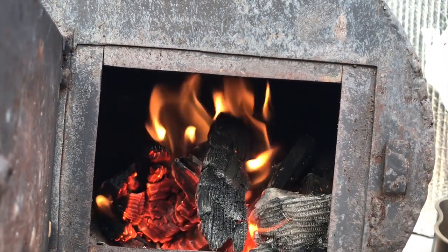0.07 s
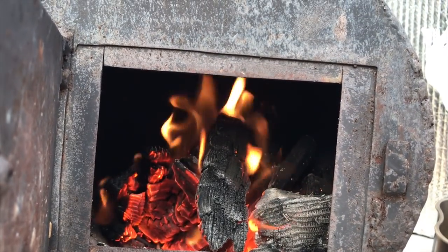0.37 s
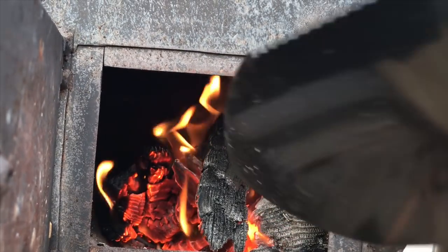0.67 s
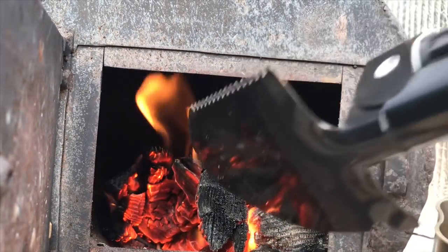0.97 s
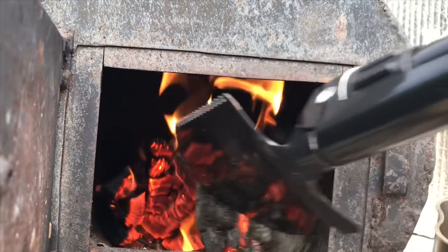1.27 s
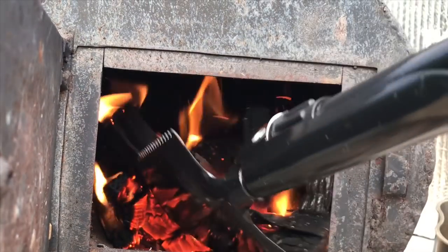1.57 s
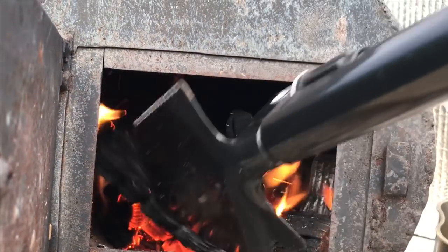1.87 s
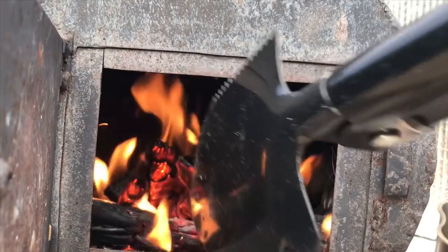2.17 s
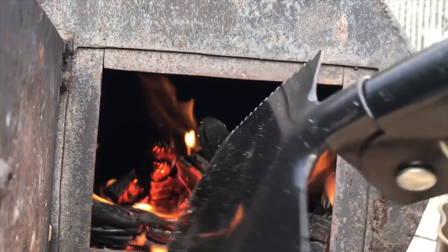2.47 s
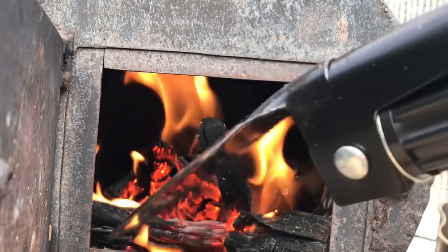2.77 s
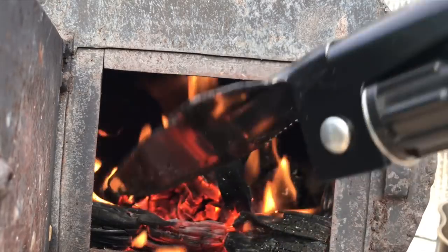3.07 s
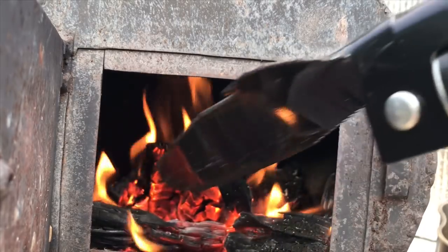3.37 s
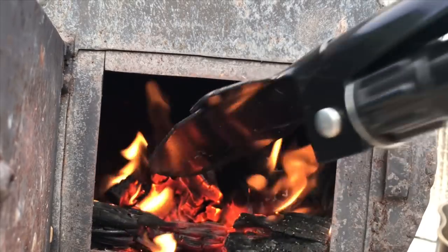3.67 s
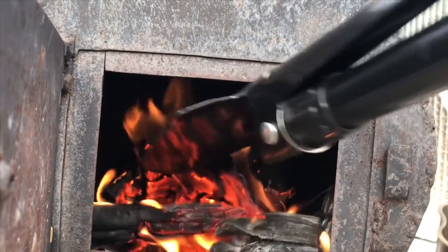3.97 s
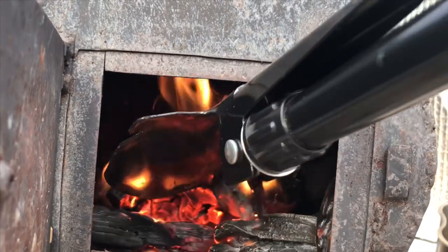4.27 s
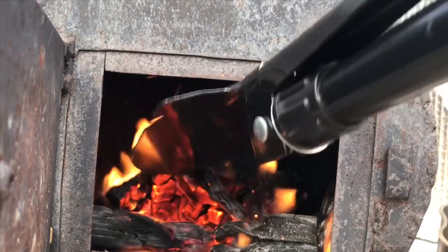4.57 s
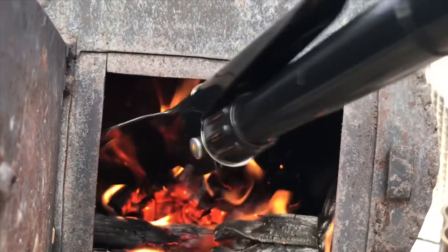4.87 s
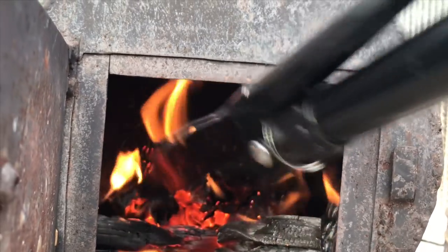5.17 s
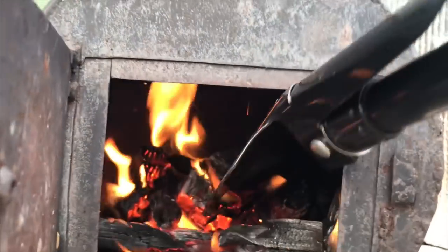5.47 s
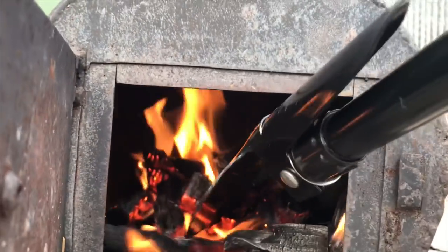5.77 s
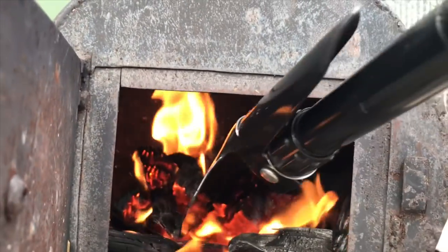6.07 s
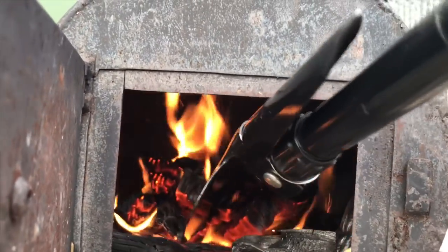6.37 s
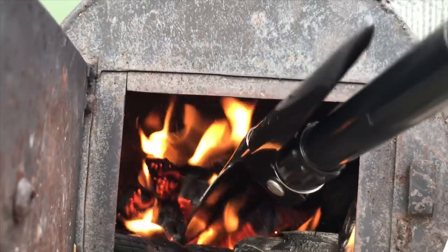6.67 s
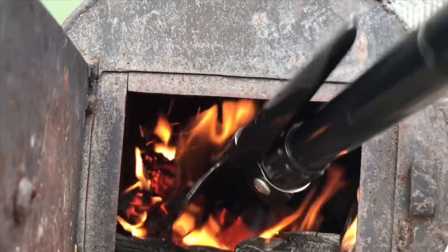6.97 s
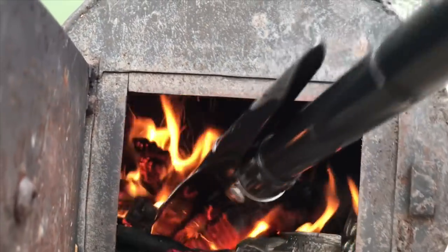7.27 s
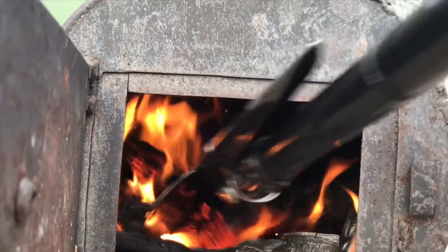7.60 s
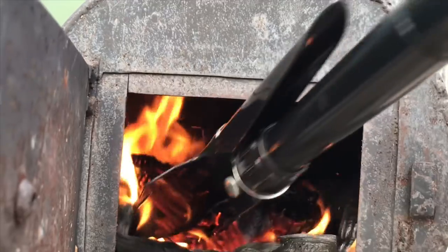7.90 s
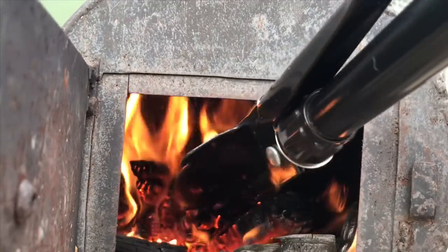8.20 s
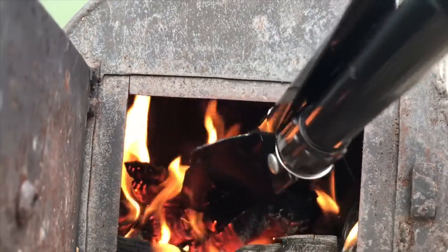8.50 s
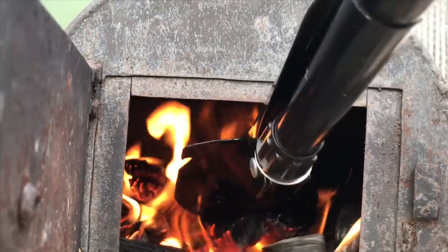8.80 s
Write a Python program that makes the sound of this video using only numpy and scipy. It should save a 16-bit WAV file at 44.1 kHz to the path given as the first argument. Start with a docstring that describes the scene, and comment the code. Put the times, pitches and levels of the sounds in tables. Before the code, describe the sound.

An open wood stove is heard from close by: flames flutter with a soft low rumble, under a fine sizzle and sharp wood snaps that continue throughout. At about 1.2 seconds a steel shovel crunches into brittle charcoal, scrapes over the grate and knocks on the iron firebox, hardest at 1.6, then squeaks around 2. From 2.4 the fire crackles alone. A clang at 3.6 and a louder double knock near 3.85 open a longer bout of stirring, with a sharp snap at 4.1. Uneven gritty strokes follow while logs judder over the iron with a low hum. Ringing thuds come at 4.6 and cluster between 5.1 and 5.6. Crunching continues with loud snaps and brighter metallic knocks near 6.6, 7.1, 7.4 and 8.2. Short steel squeaks fall between 7.3 and 8, the last the strongest. A final crunching push comes around 8.7.

```python
"""A steel shovel stirs burning logs and coals in an open wood stove, heard from close by.
Flames flutter and wood snaps from the start and throughout. From 1.15 s the blade crunches through
brittle charcoal, drags over the grate, knocks on the iron firebox and shoves logs along it; near 2 s
it sticks and squeaks. From 2.4 s the fire burns alone. At 3.6 s a knock opens a longer bout of
stirring, with more squeaks around 8 s."""
import sys
import numpy as np
from scipy import signal
from scipy.fft import rfft, irfft
from scipy.io import wavfile

SR = 44100
rng = np.random.default_rng(int(sys.argv[2]) if len(sys.argv) > 2 else 0)


def wav_record(signal):
    """Record a signal, one row per channel, as 16-bit PCM in the file named by sys.argv[1]."""
    frames = np.transpose(np.atleast_2d(signal))
    bounded = np.clip(frames, -1, 1)
    # unit amplitude maps onto the largest positive 16-bit level
    quanta = np.round(bounded * 32767).astype(np.int16)
    wavfile.write(sys.argv[1], SR, quanta)


N = 389844
CUTOFF_HZ = 15900
MODE_SPLIT_HZ = 750   # firebox modes below, blade modes above

# firebox, shaft and blade modes: (frequency [Hz], level [dB], t60 [s])
IRON_MODES = [(137.1, -1.5, 0.65), (223, -10, 0.43), (250, -4, 0.24), (312.5, -6.5, 0.45),
              (332, -10.5, 0.32), (367, -5.5, 0.074), (418.7, -0.5, 0.27), (437.4, -5, 0.32),
              (472, -16.5, 0.47), (634, -2.5, 0.094), (666, -9.5, 0.37), (853, -16, 0.5),
              (940, -13.5, 0.38), (985, -11.5, 0.39), (1236, -9, 0.37), (1272, 1.5, 0.19), (1475, -8, 0.12),
              (1617, -6.5, 0.25), (1780, -8, 0.095), (2085, -21.5, 0.4), (2403, -10.5, 0.19),
              (2730, -15, 0.12), (3116, -19, 0.2), (3560, -16, 0.24), (3750, -22, .08)]
# bright modes of the thin blade: (frequency [Hz], level [dB], t60 [s])
EDGE_MODES = [(2700, 2.5, 0.021), (3116, -3, 0.026), (3510, -1, 0.03), (3844, 3, 0.012),
              (4364, -2.5, 0.053), (5900, -3, 0.023), (6600, -12, 0.014), (7320, 11, 0.0059),
              (8580, 6, 0.016), (9620, 6, 0.019), (11500, 2, 0.019), (12816, -0.5, .03), (13964, 0, 0.038),
              (15400, 8, 0.016)]
# spectrum of steel dragging on iron: (frequency [Hz], level [dB])
DRAG_SPECTRUM = [(450, -11.5), (750, -4), (960, 9), (1100, 1), (1300, 6.5), (1800, 4.5), (2400, -2.5),
                 (3400, 2.5), (6000, -8)]


def from_db(db):
    return 10 ** (np.asarray(db) / 20)


def rms_one(x):
    return x / np.sqrt(np.mean(x ** 2) + 1e-20)


def in_time(rows):
    """Each column of a curve at every sample."""
    times_s, *columns = np.transpose(rows)
    return [np.interp(np.arange(N) / SR, times_s, column) for column in columns]


def add(out, start_s, sound):
    i = int(np.clip(start_s * SR, 0, N - 1))
    out[i:i + len(sound)] += sound[:N - i]


def drift(rate_hz):
    """Smooth random wander; rms 1."""
    hop, settle = 40, 2000
    r = np.exp(-2 * np.pi * rate_hz * hop / SR)
    noise = rng.standard_normal(N // hop + settle + 2)
    slow = signal.lfilter([1], [1, -2 * r, r * r], noise)[settle:]
    return np.interp(np.arange(N) / hop, np.arange(len(slow)), rms_one(slow))


def colour(x, spectrum):
    """Minimum-phase filter from (frequency [Hz], level [dB]), -18 dB/octave past its ends; rms 1."""
    size = 8192
    hz, db = np.transpose(spectrum)
    octave = np.log2(np.maximum(np.arange(size // 2 + 1), 1) * SR / size)
    outside = np.abs(octave - np.clip(octave, np.log2(hz[0]), np.log2(hz[-1])))
    gain = from_db(np.interp(octave, np.log2(hz), db) - 18 * outside)
    cepstrum = irfft(np.log(gain))
    response = irfft(np.exp(rfft(2 * cepstrum[:size // 2], size)))
    return rms_one(signal.fftconvolve(x, response)[:len(x)])


def grains(per_s, spread_db):
    """Random clicks of uneven size; rms 1."""
    sizes = from_db(spread_db * np.minimum(rng.exponential(1, N), 4))
    return rms_one(sizes * rng.choice([-1, 1], N) * (rng.random(N) < per_s / SR))


def ring(force, hz, t60_s):
    """One mode: a unit click starts a decaying sine of height 1."""
    r, w = from_db(-60 / (t60_s * SR)), 2 * np.pi * hz / SR
    return signal.lfilter([0, np.sin(w)], [1, -2 * r * np.cos(w), r * r], force + 1e-18)


def rub(force, modes, wander_db):
    """A sliding contact drives each mode by a share that changes as it travels; rms 1."""
    return rms_one(sum(ring(force * from_db(db + wander_db * drift(4.3)), hz, t60_s)
                       for hz, db, t60_s in modes))


def pushes(rows, attack_s, release_db_per_s):
    """Envelope from (time [s], length [s], level [dB], swell [dB]); overlaps add in power."""
    power = np.zeros(N)
    for start_s, length_s, db, swell_db in rows:
        t = np.arange(int((length_s + 50 / release_db_per_s) * SR)) / SR
        held_db = db + swell_db * (np.minimum(t / length_s, 1) - .5)
        release_db = release_db_per_s * np.maximum(t - length_s, 0)
        push = np.minimum(t / attack_s, 1) * from_db(held_db - release_db)
        add(power, start_s, push ** 2)
    return np.sqrt(power)


def firebox(x, wet_db, t60_s):
    """Adds dense, short reflections between the stove's walls."""
    t = np.arange(SR // 5) / SR
    echoes = rng.standard_normal(len(t)) * from_db(-60 * t / t60_s) * (t > .0015)
    return x + from_db(wet_db) * signal.fftconvolve(x, echoes / np.linalg.norm(echoes))[:N]


def fire():
    """Flames rumble and flutter in low puffs; sap sizzles and ticks."""
    # spectra: (frequency [Hz], level [dB])
    flame_spectrum = [(12, -25), (20, -69), (54, 1.5), (160, -11.5), (235, -3), (276, -15), (312, -14),
                      (414, -26.5), (517, -20), (823, -24), (1210, -24), (2500, -38), (3250, -61),
                      (5500, -120)]
    sizzle_spectrum = [(1500, 1), (3000, -3.5), (4500, -3), (6500, 0.5), (10000, -3), (13000, 1.5),
                       (15500, 3)]
    puff_spectrum = [(70, -2.5), (120, -1), (230, -7), (310, -13), (420, -17.5)]
    tick_spectrum = [(3000, -5.5), (7000, -3.5), (13000, 2.0), (15500, -2)]
    roar = from_db(-53) * colour(rng.standard_normal(N) * from_db(2 * drift(20)), flame_spectrum)
    puffing = rng.standard_normal(N) * from_db(6 * np.minimum(drift(22), 2))
    puffs = from_db(-55.5) * colour(puffing, puff_spectrum)
    sizzle = from_db(-59.5) * colour(grains(per_s=7000, spread_db=3.5), sizzle_spectrum)
    ticks = from_db(-60) * colour(grains(per_s=110, spread_db=7.5), tick_spectrum)
    return roar + puffs + sizzle + firebox(ticks, wet_db=-2, t60_s=0.016)


def snaps():
    """Wood and coals fracture, then splinter for milliseconds; smaller pieces have less body."""
    # fractures: (time [s], relative level [dB], pitch [Hz])
    fractures = [(0.0188, -18, 11200), (0.181, -24.5, 13200), (0.2426, -19.5, 7900), (0.406, -21.5, 14100),
                 (0.6728, -23.5, 4070), (0.7479, -14, 6000), (1.067, -22.5, 4160), (1.1497, -8.5, 14000),
                 (2.0438, -18, 3890), (2.1236, -9, 3380), (2.1876, -9, 12800), (2.3055, -14, 12300),
                 (2.423, -21, 15000), (2.4646, -15.5, 16000), (2.485, -21.5, 3214), (2.514, -13, 14200),
                 (2.573, -14, 14200), (2.6564, -25, 12900), (2.774, -23, 7500), (3.1153, -14, 5470),
                 (3.1526, -17, 9200), (3.18, -23, 9460), (3.281, -20, 11200), (3.3354, -12.5, 13000),
                 (3.4003, -11.5, 11600), (3.5162, -13, 11900), (3.5538, -22, 4100), (3.6425, -16, 14800),
                 (3.71, -17, 5640), (3.932, -1, 13900), (3.9743, -4.5, 4160), (4.0065, -20, 9570),
                 (4.1004, 5, 10000), (4.2677, -11, 11400), (4.2975, -13, 14400), (4.5118, -19, 14000),
                 (5.3645, -19, 12400), (5.454, -19, 6300), (5.7553, -14, 8500), (5.8605, -8, 7900),
                 (5.9453, -11, 8500), (5.9956, -1, 8470), (6.5137, -5.5, 4020), (6.571, -1.5, 3510),
                 (7.0317, -7, 4860), (7.079, -8, 3070), (7.105, -7, 6390), (7.5385, -7.5, 12270),
                 (7.7132, -0.5, 14700), (7.8912, 0, 6000), (8.076, -13, 11500), (8.1435, -20, 5470),
                 (8.1844, -17, 7080), (8.277, -12.5, 9000), (8.554, -11.5, 13200), (8.762, 0, 12700)]
    out, t = np.zeros(N), np.arange(int(.04 * SR)) / SR
    splintering = from_db(-60 * t / 0.0015) + from_db(-2.5 - 60 * t / 0.018)
    bandwidth_hz = 2200
    r = np.exp(-np.pi * bandwidth_hz / SR)
    gain = (1 - r * r) / 2
    for start_s, db, hz in fractures:
        burst = rng.standard_normal(len(t)) * splintering
        burst[0] = 5.8   # the first break is the strongest
        w = 2 * np.pi * min(hz, CUTOFF_HZ) / SR
        piece = signal.lfilter([gain, 0, -gain], [1, -2 * r * np.cos(w), r * r], burst)
        body_db = min(0.35 * (db - 2), 2)   # loud snaps come from thick wood
        body = [(900, body_db - 3.5), (2000, body_db - .5), (3500, body_db + 2)]
        snap = colour(piece + 0.74 * burst, body + [(7000, 0.32), (15000, 0.64)])
        add(out, start_s + 0.00054, from_db(db - 29.5) * snap)   # a snap peaks far above its rms
    return out


def stirring():
    """Blade strokes over the steady trickle of each dig drive the crunch and the drag."""
    # blade dug in, embers trickling past: (time [s], length [s], crunch [dB], drag [dB])
    digs = [(1.152, 1.14, -44, -56), (3.696, 0.53, -50.5, -55), (4.315, .19, -62, -63),
            (4.651, 0.47, -46.5, -52), (5.714, 1.8, -48.5, -61), (6.947, 1.12, -46, -49.5),
            (8.451, 0.32, -43.5, -50.5)]
    # pushes through the coals: (time [s], length [s], crunch [dB], drag [dB], swell [dB])
    strokes = [(1.165, .09, -37.5, -50, -2), (1.255, .18, -29, -53, 5), (1.43, 0.14, -33.5, -57, 4),
               (1.545, 0.088, -30.5, -43.5, 7), (1.78, 0.032, -31.5, -42, -3),
               (1.835, 0.17, -34.5, -44, -13), (2.015, 0.15, -34.5, -43, -8), (3.735, 0.094, -43, -55, 9),
               (3.88, 0.25, -36, -44.5, 1), (4.12, 0.2, -44, -50.5, -3), (4.665, 0.12, -40.5, -48, 10.5),
               (4.79, 0.072, -49, -39, 3), (4.895, 0.096, -36.5, -41.5, 1), (5.065, 0.027, -46, -58, -2),
               (5.385, .13, -53.5, -48, 2), (5.625, .055, -51, -38.5, -13),
               (5.708, 0.066, -26.5, -38, -8.5), (5.852, 0.034, -38, -55, -2), (5.94, 0.14, -32, -43.5, 8),
               (6.228, 0.072, -38, -50, 9), (6.42, 0.073, -45, -49, 2), (6.498, 0.085, -29.5, -38.5, -3),
               (6.675, 0.12, -40.5, -50, 1), (6.768, 0.062, -32.5, -38.5, 0.5), (6.89, 0.078, -46, -54, 11),
               (7.025, 0.13, -31.5, -49, 15), (7.3, 0.066, -34.5, -44, -6), (7.358, 0.04, -23, -32.5, -0.5),
               (7.57, 0.15, -42, -45, -8), (7.66, 0.087, -32, -38, -1), (7.908, 0.15, -36.5, -48, -1),
               (8.19, .12, -43.5, -40.5, -13), (8.378, 0.045, -42.5, -59, -4),
               (8.485, 0.093, -40.5, -42.5, 9.5), (8.708, 0.083, -28.5, -35, 6)]
    moves = list(strokes) + [(*dig, 0) for dig in digs]
    start_s, length_s, crunch_db, drag_db, swell_db = np.transpose(moves)
    breaking, dragging = [
        pushes(zip(start_s, length_s, db, swell_db), attack_s=0.015, release_db_per_s=443)
        for db in (crunch_db, drag_db)]
    catching = from_db(2.41 * drift(72))   # the edge catches and slips
    return crunch(breaking * catching) + drag(dragging * catching)


def crunch(envelope):
    """Charcoal breaks in clumps of tiny fractures that ring its pieces and the blade's edge."""
    # breaking charcoal: (frequency [Hz], level [dB])
    dust_spectrum = [(1200, -26), (2300, -15.5), (3400, -5), (4500, 0), (5300, 1), (6400, 5.5), (7400, -3),
                     (8500, 5), (10200, -4), (12000, 3.5), (15500, 2.5)]
    # coarse char is dull, fine embers bright: (time [s], treble gain [dB])
    fineness = [(1.1, 2), (2.2, -25.5), (4.05, 5), (4.85, 8), (6.05, -3), (7.2, -1.5), (7.7, 0)]
    dust = envelope * from_db(-2.5) * colour(grains(per_s=7000, spread_db=0), dust_spectrum)
    pieces = envelope * from_db(-7.5) * clinks(per_s=1800, t60_cycles=110, wander_db=4, count=40)
    edge_force = envelope * grains(per_s=2000, spread_db=-1)
    edge = np.std(envelope) * from_db(-7) * rub(edge_force, EDGE_MODES, wander_db=6.5)
    mix = dust + pieces + edge
    treble = signal.lfilter(*signal.butter(1, 11000, "high", fs=SR), mix)
    treble_db, = in_time(fineness)
    return mix + (from_db(treble_db) - 1) * treble


def clinks(per_s, t60_cycles, wander_db, count):
    """Charcoal pieces ring in flurries, each at its own pitch; rms 1."""
    pitches_hz = np.geomspace(3000, 15000, count) * rng.uniform(.97, 1.03, count)
    fractures = grains(per_s, spread_db=4)
    piece = rng.integers(0, count, N)
    out = np.zeros(N)
    for k, hz in enumerate(pitches_hz):
        flurry = from_db(wander_db * drift(19))
        out += ring(fractures * (piece == k), hz, t60_cycles / hz) * hz * flurry
    return rms_one(out)


def drag(envelope):
    """The edge scrapes over the grate and sets the blade ringing."""
    scrape = envelope * from_db(-5) * colour(grains(per_s=3000, spread_db=1), DRAG_SPECTRUM)
    blade_modes = [mode for mode in IRON_MODES if mode[0] > MODE_SPLIT_HZ]
    return scrape + from_db(-6) * np.std(scrape) * rub(scrape, blade_modes, wander_db=3)


def knocks():
    """A blow chatters for its contact time, then decays: dull thud, ringing iron, burst of grit."""
    # blade and logs hit the iron:
    # (time [s], thud [dB], thud pitch [Hz], clang [dB], clang pitch [Hz], crack [dB], contact [s])
    blows = [(1.183, -34.5, 432, -29.5, 1090, -31, 0.0034), (1.222, -37, 410, -35.5, 1330, -54, 0.0052),
             (1.615, -29, 292, -23.5, 900, -17, 0.02), (1.788, -34, 620, -31, 1550, -28, 0.0041),
             (2.183, -30, 452, -30.5, 1260, -48, 0.0014), (3.569, -26, 334, -18.5, 1400, -19.5, 0.0058),
             (3.8398, -20, 364, -18, 1620, -25, 0.011), (3.859, -24, 420, -19, 1240, -24, 0.0047),
             (4.599, -27.5, 378, -22, 1470, -22, 0.0051), (5.135, -23, 306, -24, 910, -23, 0.018),
             (5.236, -24.5, 342.5, -24.5, 1120, -32, 0.0041), (5.258, -33.5, 422, -32, 1280, -37.5, 0.045),
             (5.387, -40.5, 330, -41, 1100, -46, 0.018), (5.454, -35, 230, -43, 1310, -39, 0.021),
             (5.587, -21.5, 183, -24.5, 1060, -36, 0.011), (5.646, -33, 400, -30.5, 1570, -33, 0.0096),
             (6.570, -52, 400, -28, 1050, -20, 0.012), (7.079, -45, 420, -21, 1326, -17.5, 0.013),
             (7.385, -42, 400, -28.5, 1240, -17.5, 0.0038), (8.223, -28, 480, -19.5, 1360, -32, 0.01)]
    # body of a blow: (frequency [Hz], level [dB])
    thud_spectrum = [(45, -68), (90, 20.5), (140, 4), (260, 9), (420, 1), (650, -9.5), (1000, 2.5)]
    # burst of grit: (frequency [Hz], level [dB])
    crack_spectrum = [(1500, -9), (2400, -11), (3600, 6), (5500, 8), (9000, 4), (15500, 2.5)]
    out, t = np.zeros(N), np.arange(int(.8 * SR)) / SR
    hz, mode_db, t60_s = np.transpose(IRON_MODES)
    rasps = colour(rng.standard_normal(N), DRAG_SPECTRUM)
    grit = grains(per_s=10000, spread_db=5)
    cracks = colour(grit + 1.36 * rub(grit, EDGE_MODES, wander_db=7), crack_spectrum)
    for start_s, thud_db, thud_hz, clang_db, clang_hz, crack_db, contact_s in blows:
        span = rng.integers(N - len(t)) + np.arange(len(t))
        free_s = np.maximum(t - contact_s, 0)
        attack = 1 - np.exp(-t / 0.00047)
        # the spot hit favours firebox modes near one pitch, blade modes near another
        box_db = thud_db - 3 - 6 * np.abs(np.log2(hz / thud_hz))
        blade_db = clang_db - 2 - np.minimum(41 * np.abs(np.log2(hz / clang_hz)), 8)
        drive_db = np.where(hz < MODE_SPLIT_HZ, box_db, blade_db) + rng.normal(0, 2.64, len(hz))
        detuned_hz = hz * (1 + rng.normal(0, 0.005, len(hz)))   # load on the blade shifts the modes
        waves = np.sin(2 * np.pi * (detuned_hz[:, None] * t + rng.random((len(hz), 1))))
        ringing = from_db(mode_db + drive_db) @ (waves * from_db(-60 * t / t60_s[:, None]))
        body = [(f, db - 3.9 * abs(np.log2(f / thud_hz))) for f, db in thud_spectrum]
        thud = from_db(thud_db - 2.5 - 60 * free_s / 0.072) * colour(rng.standard_normal(len(t)), body)
        rasp = from_db(clang_db - 10.5 - 60 * free_s / 0.17) * rasps[span]
        crack_decay = from_db(-60 * free_s / 0.061) + from_db(-13.5 - 60 * t / 0.21)
        crack = from_db(crack_db - 6.5) * crack_decay * cracks[span]
        add(out, start_s, attack * (ringing + thud + rasp + crack))
    return out


def sliding_logs():
    """Logs judder over the iron and set the firebox humming; the pitch glides from shove to shove."""
    # shoves: (time [s], length [s], level [dB], pitch [Hz])
    shoves = [(1.314, 0.36, -47, 523), (1.786, 0.28, -47, 595), (3.904, 0.34, -47, 240),
              (4.307, 0.057, -49.5, 180), (4.7, 0.2, -40, 346), (4.93, 0.4, -48.5, 266),
              (5.371, 0.13, -44.5, 250), (5.628, 0.18, -48.5, 180), (5.985, 1.0, -53.5, 215),
              (7.017, 0.79, -47, 220), (7.422, 0.057, -41, 213), (7.857, 0.18, -48, 217),
              (8.27, 0.95, -47, 212)]
    start_s, length_s, db, shove_hz = np.transpose(shoves)
    envelope = pushes(zip(start_s, length_s, db, np.zeros(len(db))), attack_s=0.036, release_db_per_s=83)
    pitch_hz, = in_time(sorted(zip(start_s + length_s / 2, shove_hz)))
    centres_hz = np.geomspace(110, 750, 9)
    weights = from_db(-9 * np.abs(np.log2(centres_hz[:, None] / pitch_hz)))
    weights /= np.sqrt((weights ** 2).sum(axis=0))
    bands = [rms_one(ring(grains(per_s=300, spread_db=5.5), hz, t60_s=10.1 / hz)) for hz in centres_hz]
    rumble = envelope * from_db(-1.5) * (weights * bands).sum(axis=0)
    box_modes = [mode for mode in IRON_MODES if mode[0] < MODE_SPLIT_HZ]
    return rumble + from_db(-7) * np.std(rumble) * rub(rumble, box_modes, wander_db=3)


def squeaks():
    """One mode swells while the steel sticks and slips, then rings out."""
    # stick-slip tones: (time [s], level [dB], pitch [Hz], swell [s], t60 [s], waver [share of pitch])
    tones = [(1.89, -36.5, 3500, 0.037, 0.16, 0.11), (1.988, -35, 3800, 0.088, 0.082, .045),
             (2.123, -29, 3550, 0.0033, 0.033, 0.043), (2.145, -32, 2820, 0.0025, 0.051, 0.053),
             (2.192, -56, 3235, .02, 1.3, .001), (5.46, -51, 2085, .01, 0.37, .002),
             (5.859, -39.5, 1457, .004, 0.19, .003), (7.275, -41.5, 1445, 0.0059, .12, 0.0056),
             (7.396, -29, 1272, 0.011, 0.075, .008), (7.656, -36.5, 2850, 0.015, 0.088, 0.069),
             (7.757, -29, 8500, .005, 0.068, .001), (8.01, -28.5, 1450, 0.0066, 0.085, .01),
             (8.027, -22, 1457, 0.015, .11, 0.0055)]
    out, t = np.zeros(N), np.arange(int(.8 * SR)) / SR
    for start_s, db, hz, swell_s, t60_s, waver in tones:
        envelope = np.minimum(t / swell_s, 1) * from_db(db - 60 * np.maximum(t - swell_s, 0) / t60_s)
        pitch_hz = hz * (1 + waver * drift(270)[:len(t)])
        add(out, start_s, envelope * np.sin(2 * np.pi * np.cumsum(pitch_hz) / SR))
    return out


def scene():
    burning = fire() + firebox(snaps(), wet_db=-14, t60_s=0.14)
    return (burning + stirring() + knocks() + sliding_logs() + squeaks())[None]


def record(dry):
    """Overload at full scale, then a steep low-pass."""
    lowpass = signal.ellip(12, .1, 80, CUTOFF_HZ, fs=SR, output="sos")
    return signal.sosfilt(lowpass, np.clip(dry, -1, 1))


dry = scene()
out = record(dry)
wav_record(out)
```